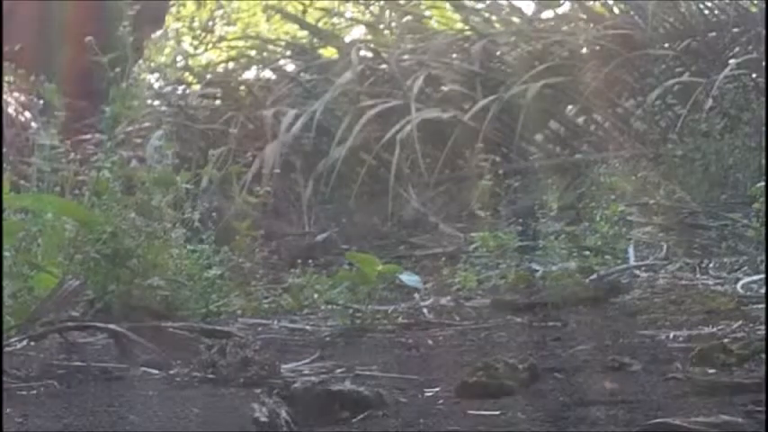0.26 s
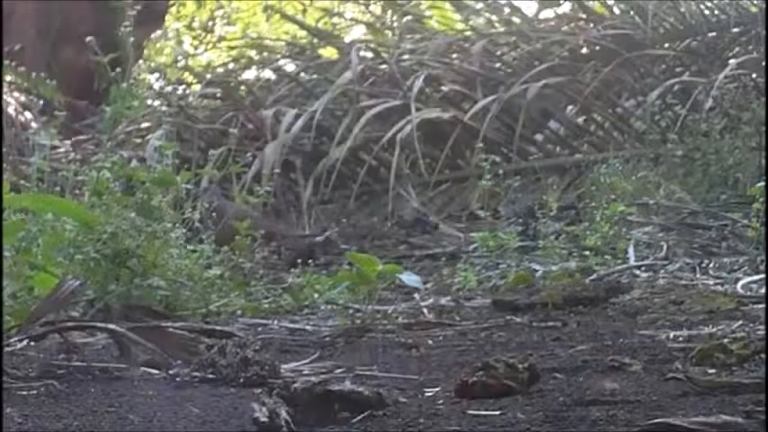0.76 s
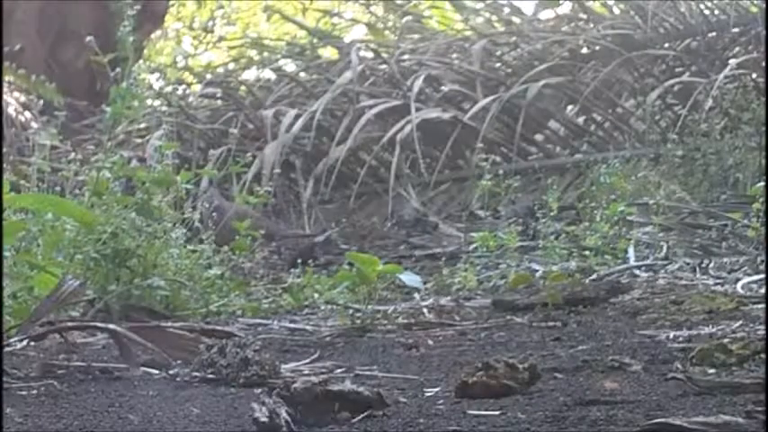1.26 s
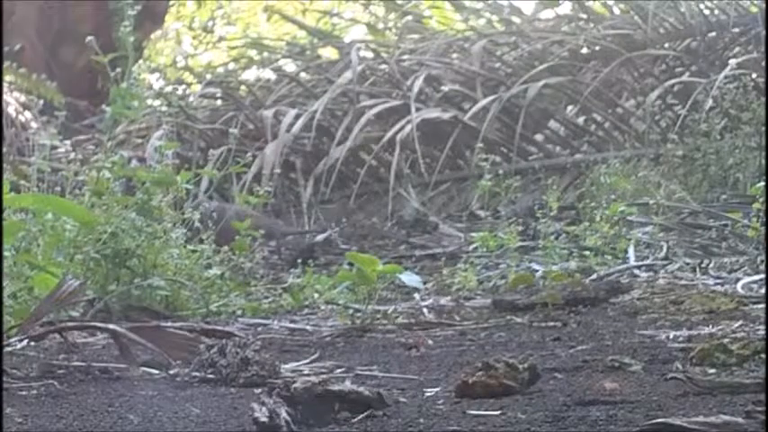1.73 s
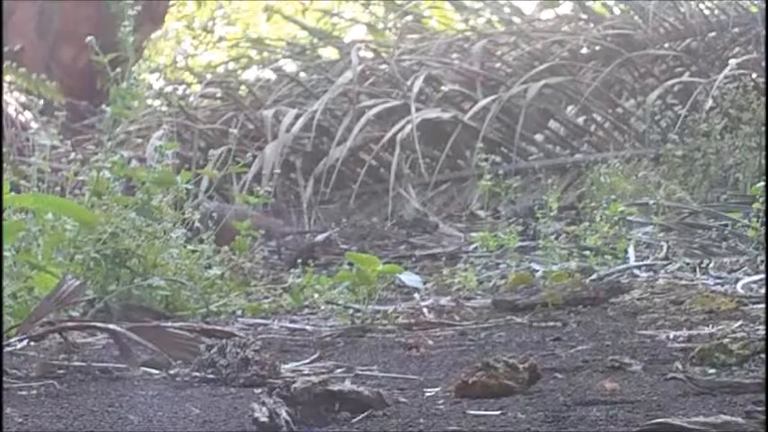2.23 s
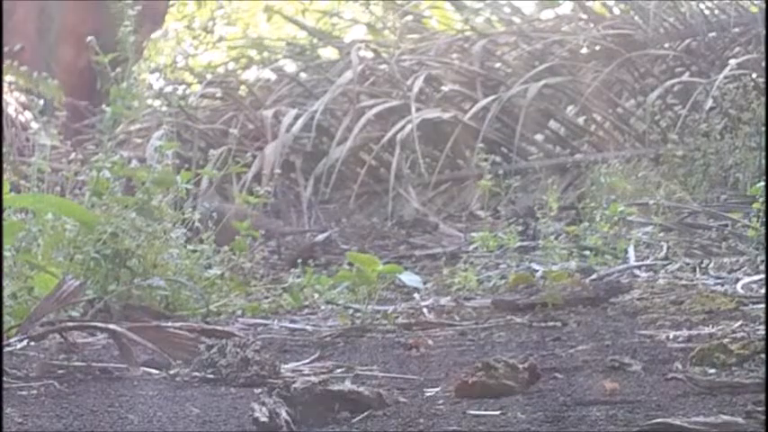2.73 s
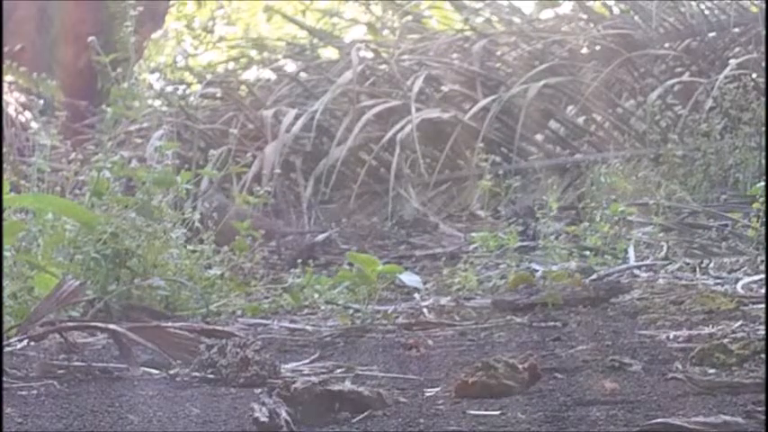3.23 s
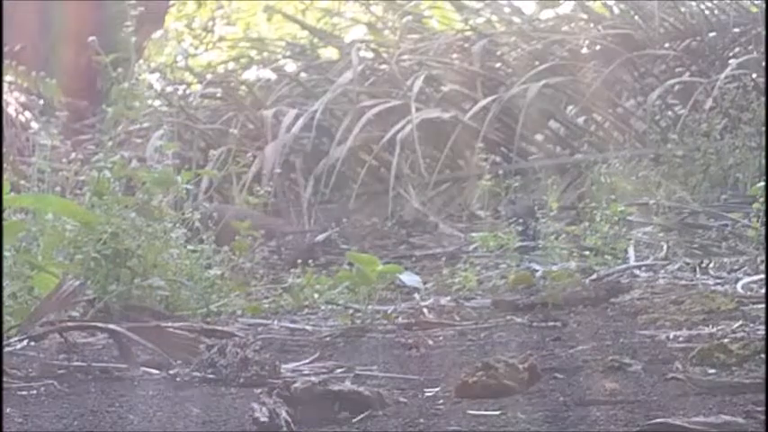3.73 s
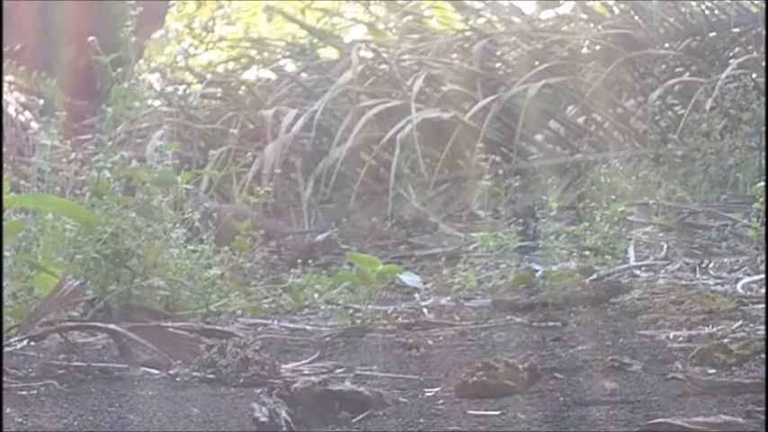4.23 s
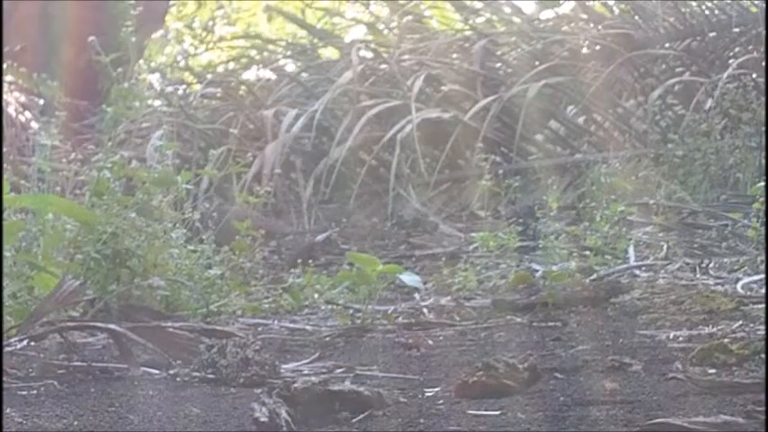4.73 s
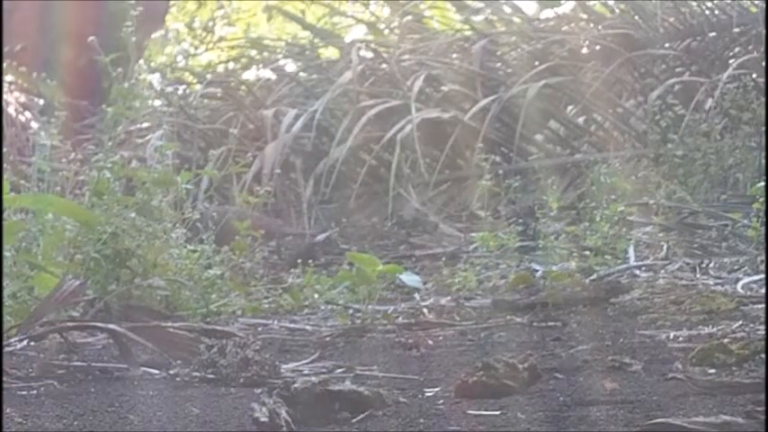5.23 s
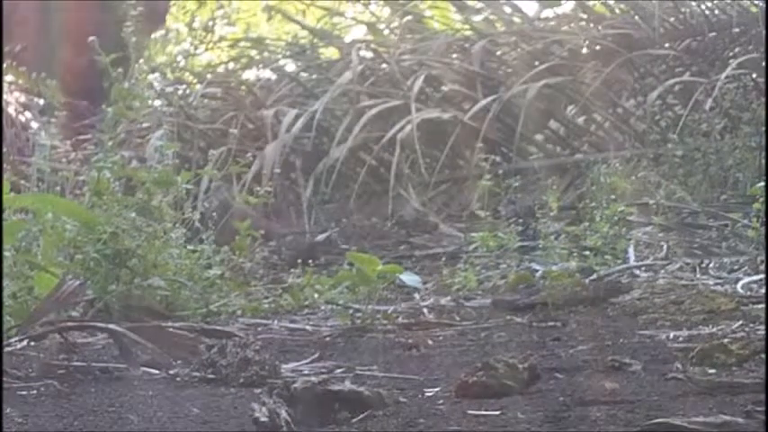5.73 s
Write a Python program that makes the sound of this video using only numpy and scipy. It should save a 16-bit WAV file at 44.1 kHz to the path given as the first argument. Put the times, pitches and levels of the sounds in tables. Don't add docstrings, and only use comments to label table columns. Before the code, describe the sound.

Outdoors in quiet undergrowth, a small mono camera hisses steadily over thin insect hum and faint low traffic. A far dove hoots and purrs, a songbird repeats a quick slowing phrase, and a nearer dove answers with swelling, rolling coos in three bouts. The far dove overlaps its later purrs. Near the end another small bird gives regular bright chirps. Light woodland echo surrounds the birds.

```python
import sys
import numpy as np
from scipy import signal
from scipy.fft import rfft, irfft, dct
from scipy.io import wavfile
from scipy.ndimage import uniform_filter1d

SR = 44100
rng = np.random.default_rng(int(sys.argv[2]) if len(sys.argv) > 2 else 0)


def linear_from_db(decibels):
    return 10 ** (np.asarray(decibels, float) / 20)


def inscribe(sig):
    pcm = np.round(np.clip(np.atleast_2d(sig).T, -1, 1) * 32767)
    wavfile.write(sys.argv[1], SR, pcm.astype(np.int16))


N = 263718

# (frequency [Hz], level [dB])
DRONE_LEVEL = [(0, -79.5), (1.299, -80), (1.6, -78), (3.2, -75), (3.599, -80), (5.98, -81)]
DRONE_COLOUR = [(100, -49), (160, -5.5), (185, -9), (210, 0.5), (240, -14.0), (330, -15), (450, -30.5)]

# (centre [Hz], width [Hz], level [dB])
INSECT_BANDS = [
    (7200, 610, -65.0),
    (6970, 830, -67.5),
]

# (frequency [Hz], level [dB per Hz])
HISS_COLOUR = [(25, -31), (60, -29), (105, -17.5), (165, -17), (210, -15), (260, -8), (700, -1.5),
               (1300, -3), (2200, -5), (4000, -10.5), (6000, -10.5), (8600, -12), (12000, -9.5),
               (12800, -15), (14300, -8.5)]
HISS_DB = -57.5
PUFF_COLOUR = [(2500, -37), (5500, 29), (6500, 47.5), (8500, 32), (11500, 43.5), (13000, 19), (15000, -69)]
PUFF_TICKS = [0, 4, 9, 13, 15, 20, 24, 29, 34, 35, 40, 45, 50, 54, 56, 60, 70, 75, 76, 81, 85, 90, 95, 96,
              100, 105, 110, 114, 116]
CLOCK_S, FIRST_TICK_S, PUFF_DB = .05, .004, -60.5

# (time [s], bar over the hiss
# [dB])
THIN_MOMENTS = [(.18, 4), (.243, 4), (.412, 5), (.71, 6.5), (1.183, 4), (2.354, 7), (2.48, 6), (2.527, 4),
                (2.568, 5), (3.25, 4), (3.656, 5), (4.038, 4), (4.274, 3), (4.423, 4), (4.617, 3),
                (4.698, 4), (4.829, 7), (5.278, 5), (5.47, 7), (5.659, 6.5),
                (.308, 7),
    (.325, 7),
    (4.535, 8),
    (4.552, 7),
]
# (frequency [Hz], added level [dB])
BAR_SHAPE = [(300, 4), (1200, -3), (2500, -1), (4500, 2), (6200, 2), (7200, -2), (8500, 2), (15000, 1)]

# (time [s], fundamental [Hz], level [dB])
WHISTLE = [(.45, 690, -75), (.5, 702, -69), (.62, 687, -68), (.75, 685, -69), (.88, 660, -66),
           (1.0, 632, -67.5), (1.09, 624, -77.5)]
# (multiple [number], level at the start [dB], level at the end [dB])
WHISTLE_OVERTONES = [
    (4, 6, -10),
    (5, -1.5, -1.5),
    (6, -4, 2.5),
]

# (time after the start [s], pitch [Hz], level [dB])
NOTE_SHAPES = dict( rise=[(0, 1160, -7), (.012, 1640, 5), (.024, 2450, -6)], hook=[(0, 2573, -14),
               (.008, 2345, 4), (.02, 2240, 5.5), (.034, 2297, -22)], drop=[(0, 1703, -23), (.01, 1574, 4),
               (.024, 1340, -9.5)], slide=[(0, 2195, 3.5), (.016, 1939, 3), (.03, 1750, -4),
               (.045, 1600, -44)], whip=[(0, 3205, -9.5), (.01, 2880, 0.5), (.017, 2580, 0.5),
               (.023, 2030, -3)], pip=[(0, 1496, -17), (.012, 1400, 8.5), (.026, 1310, -16)],
               chirp=[(0, 2660, -3.5), (.015, 3086, -1), (.022, 3500, -2.5), (.027, 4265, -9),
               (.031, 6060, -10), (.032, 3000, -11), (.043, 3740, -7.5), (.05, 4100, -29)],
               lead=[(0, 2672, -1), (.015, 2858, 1), (.024, 3050, 3), (.036, 2750, -6)],
               lift=[(0, 1489, -4), (.018, 1510, -7), (.024, 1970, -3.5), (.04, 2050, -24)])
# (note [name], time after the start [s], part [name], level [dB], starting pitch [Hz])
PHRASE = [
    ("rise", 0, "head", -6.5, 1150),
    ("hook", .023, "head", 0, 2540),
    ("drop", .079, "tail", -4, 1630),
    ("slide", .146, "slide", 0, 2110),
    ("whip", .225, "tail", 0, 3220),
    ("pip", .24, "tail", -14, 1430),
]
# (start [s], stretch [ratio], head level [dB], slide level [dB], tail level [dB])
REPEATS = [
    (1.2, 0.98, -47, -45.5, -46.5),
    (1.523, 1.043, -50.5, -57, -46),
    (1.855, 1.105, -47.5, -53, -52),
    (2.207, 1.12, -49.5, -93, -95),
]
# (time [s], level [dB], grace note level [dB])
CHIRPS = [
    (5.116, -63.5, -90),
    (5.241, -62.5, -90),
    (5.367, -55.5, -90),
    (5.491, -52.5, -90),
    (5.645, -54, -63),
    (5.786, -55, -60),
    (5.93, -53.5, -65.5),
]
CHIRP_HZ, GRACE_HZ, GRACE_S = 2716, 2564, .022
# (note [name], time [s], level [dB], starting pitch [Hz])
STRAYS = [("lift", 0.00414, -53.5, 1512), ("pip", 0.0069, -70, 3230), ("whip", .558, -62, 3160),
          ("pip", 1.411, -54.5, 2004), ("pip", 1.672, -57, 2400), ("whip", 1.685, -64, 3750),
          ("pip", 2.035, -52.5, 1934), ("pip", 2.106, -55.5, 2353), ("pip", 2.305, -61, 2330),
          ("pip", 3.336, -63, 1544), ("slide", 3.351, -68, 2100), ("pip", 3.47, -66, 1580),
          ("pip", 3.576, -63, 2084), ("pip", 3.701, -68, 1930), ("whip", 3.9, -64.5, 3210),
          ("pip", 5.44, -69, 2100), ("pip", 5.71, -69, 2350), ("lead", 5.96, -58, 2660)]
SCATTER_DB_PER_OCTAVE = 2.5

# (start [s], wait for second swell [s], clean hold [s], effort [dB], dip [dB])
OPENERS = [
    (1.66, .265, .117, -39.5, -24.5),
    (3.358, 0.22, .014, -39.5, -10),
    (4.774, .18, 0.0194, -39.5, -6),
]
# (start [s], length [s], effort [dB], top [Hz], last [Hz])
NEAR_PURRS = [
    (2.212, .512, -42.3, 708.6, 571),
    (3.76, .33, -43, 710.6, 647),
    (5.147, .545, -42, 700, 575),
]
FAR_PURRS = [
    (.725, 0.46, -52.5, 743.6, 537),
    (3.92, .535, -51.5, 758, 598),
    (5.44, .5, -53.5, 757.6, 529),
]
# (start [s], climb [s], hold [s], effort [dB], top [Hz])
HOOTS = [
    (.19, 0.041, 0.025, -63.5, 512),
    (0.444, 0.06, 0.0444, -45.5, 726),
    (3.599, .082, .012, -46, 710),
]
# sag curve [power], pitch where it weakens [Hz], fading below it [dB per Hz],
# trill (first, last) [pulses per s], loss of trill depth [share], catch of breath [dB]
NEAR_STYLE = dict(power=1.9, weak_hz=637, db_per_hz=0.09, trill=(54, 68), loss=0.457, catch_db=-0.5)
FAR_STYLE = dict(power=1.9, weak_hz=670, db_per_hz=.05, trill=(40, 74), loss=0.647, catch_db=-6)
# (time [s], width [s], trill depth lost
# [share], swell [dB])
FILLS = [(2.5, 0.0094, .6, .4), (2.61, .022, .5, 1.2), (2.69, .02, .4, 2.2), (3.815, 0.032, .4, 1.5),
         (4.0, .02, .35, -.4), (4.06, .013, .35, 2.5), (5.375, 0.034, 0.51, .4), (5.53, .04, .3, 2.2),
         (5.66, .045, .1, -6.5)]

ATTACK_S, SHUT_HZ, ONSET_DB, END_DB = 0.02483, 465.5, -15, -26
TOP_HZ, DIP_PITCH, DIP_SCALE_DB = 699, 0.38, 10
SWELL_HZ_PER_S, SWELL_DB = 650, -2
HUMP_SHARE, SNAP_S = 0.117, .012
QUICK_TRILL = 74
PURR_RISE_S, PURR_FALL_S, HOOT_FALL_S = 0.01305, 0.0324, 0.0365
CATCH_S, CATCH_WIDTH_S = 0.075, 0.016


def read(points, hz):
    f, value = np.transpose(points)
    return np.interp(np.log(hz + 1), np.log(f + 1), value)


def evened(x):
    return x / np.sqrt(np.mean(x ** 2) + 1e-20)


def add(mix, s, sound):
    part = mix[round(s * SR):][:len(sound)]
    part += sound[:len(part)]


def unroll(rows):
    s, *columns = np.transpose(rows)
    t = np.arange(s[0], s[-1], 1 / SR)
    return s[0], [np.interp(t, s, c) for c in columns]


def coloured(spectrum):
    gain = linear_from_db(read(spectrum, np.fft.rfftfreq(N, 1 / SR)))
    return evened(irfft(rfft(rng.standard_normal(N)) * gain, N))


def drift(hz):
    return evened(signal.lfilter([1], [1, -np.exp(-2 * np.pi * hz / SR)], rng.standard_normal(N)))


def woods(x, t60, wet_db, echoes, blur_db):
    t = np.arange(SR // 2) / SR
    taps = rng.choice([-1., 1.], len(t)) * (rng.random(len(t)) < .05)
    tail = taps * linear_from_db(-60 * t / t60) * np.clip(t / 0.024, 0, 1)
    blur = taps * linear_from_db(-60 * t / 0.069)
    arrival = linear_from_db(blur_db) * blur / np.linalg.norm(blur)
    arrival[0] = 1
    path = linear_from_db(wet_db) * tail / np.linalg.norm(tail) + arrival
    for s, echo_db in echoes:
        add(path, s, linear_from_db(echo_db) * arrival)
    return signal.fftconvolve(x, path)


def drone():
    s, level_db = np.transpose(DRONE_LEVEL)
    return linear_from_db(np.interp(np.arange(N) / SR, s, level_db)) * coloured(DRONE_COLOUR)


def insects():
    hz = np.fft.rfftfreq(N, 1 / SR)
    hum = np.zeros(N)
    for centre, width, level_db in INSECT_BANDS:
        resonance = 1 + (2 * (hz - centre) / width) ** 2
        hum += linear_from_db(level_db) * evened(irfft(rfft(rng.standard_normal(N)) / resonance, N))
    return hum * linear_from_db(0.11 * drift(6.2))


def camera():
    gate = np.zeros(N)
    puff = linear_from_db(PUFF_DB) * signal.windows.tukey(round(0.018 * SR), .3)
    for tick in PUFF_TICKS:
        add(gate, max(FIRST_TICK_S + CLOCK_S * tick - .008, 0), puff)
    hiss = linear_from_db(HISS_DB + 0.75 * drift(2.6)) * coloured(HISS_COLOUR)
    return hiss + gate * coloured(PUFF_COLOUR)


def whistler():
    start, (hz, level_db) = unroll(WHISTLE)
    count = len(hz)
    angle = 2 * np.pi * np.cumsum(hz * (1 + 0.0024 * drift(21)[:count])) / SR
    mix = np.zeros(N)
    for k, first_db, last_db in WHISTLE_OVERTONES:
        waver_db = 4 * drift(30)[:count]
        loudness = linear_from_db(level_db + np.linspace(first_db, last_db, count) + waver_db)
        add(mix, start, loudness * np.sin(k * angle))
    return mix


def small_bird_notes():
    song, chirps = [], []
    for start, stretch, head_db, slide_db, tail_db in REPEATS:
        part_db = dict(head=head_db, slide=slide_db, tail=tail_db)
        for note, s, part, db, hz in PHRASE:
            song.append((note, start + stretch * s, db + part_db[part], hz))
    for s, db, grace_db in CHIRPS:
        chirps.append(("chirp", s, db, CHIRP_HZ))
        chirps.append(("lead", s - GRACE_S, grace_db, GRACE_HZ))
    return song + chirps + STRAYS


def songbirds():
    mix = np.zeros(N)
    for note, s, level_db, start_hz in small_bird_notes():
        _, (hz, shape_db) = unroll(NOTE_SHAPES[note])
        pitch = hz * start_hz / hz[0]
        husk = evened(uniform_filter1d(rng.standard_normal((2, 3000)), size=110))[:, :len(hz)]
        tone = np.sqrt(2) * np.sin(2 * np.pi * np.cumsum(pitch * (1 + .022 * husk[0])) / SR)
        tone *= linear_from_db(level_db + shape_db + 2.5 * husk[1]) * signal.windows.tukey(len(hz), .15)
        wet_db = -3.0 + SCATTER_DB_PER_OCTAVE * np.log2(pitch.mean() / 2200)
        add(mix, s, woods(tone, 0.53, wet_db, [(.028, -15), (.075, -16.5)], -5.0))
    return signal.sosfilt(signal.butter(4, 800, "highpass", fs=SR, output="sos"), mix)


def hoot(start, climb, hold, effort_db, top_hz):
    end = climb + hold
    # (s, dB, pitch as a share of the top, trill depth)
    rows = [(0, -15, 0.4, 1.1), (0.604 * climb, -10.5, .88, .7), (climb, -1.5, .995, .03),
            (end, 0, 1.0, .1), (end + 0.49 * HOOT_FALL_S, -9, .89, .6), (end + HOOT_FALL_S, -30, .73, .5)]
    return [(start + s, effort_db + db, top_hz * pitch, QUICK_TRILL, depth) for s, db, pitch, depth in rows]


def opener(start, swell, hold, effort_db, dip_db):
    low = 1 - DIP_PITCH * (1 - np.exp(-(dip_db / DIP_SCALE_DB) ** 2))
    swell_hz = TOP_HZ * .92 + SWELL_HZ_PER_S * hold
    end = swell + hold
    held = 0.7 * np.exp(-hold / 0.027)
    hump = ATTACK_S + HUMP_SHARE * swell
    clear_db = -.4 - 5.9 * held
    rows = [  # (s, dB, Hz, trill depth)
        (0, ONSET_DB, SHUT_HZ, .2),
        (ATTACK_S, 0, TOP_HZ, 0),
        (hump, -1.5, TOP_HZ, .04),
        (hump + SNAP_S, -3.5, .97 * TOP_HZ, .95),
        (.41 * swell, 0.46 * dip_db - 4.5, TOP_HZ * (low + 0.101), .98),
        (.55 * swell, dip_db, TOP_HZ * low, .9),
        (.8 * swell, -5, .91 * TOP_HZ, .85),
        (swell, SWELL_DB, swell_hz, .75),
        (swell + 0.19 * hold, clear_db, swell_hz, held),
        (end - 0.23 * hold, clear_db, .97 * swell_hz, held),
        (end, clear_db + 1.2, 0.876 * swell_hz, held),
        (end + SNAP_S, END_DB, SHUT_HZ, held)]
    return [(start + s, effort_db + db, hz, QUICK_TRILL, depth) for s, db, hz, depth in rows]


def purr(start, length, effort_db, top_hz, last_hz, power, weak_hz, db_per_hz, trill, loss, catch_db,
         fills=()):
    s = np.linspace(0, length, num=120)
    share = s / length
    rise = np.exp(-s / PURR_RISE_S)
    shut = np.clip((s - length) / PURR_FALL_S + 1, 0, 1)
    sag_hz = top_hz - (top_hz - last_hz) * share ** power
    catch = np.exp(-((length - CATCH_S - s) / CATCH_WIDTH_S) ** 2)
    db = effort_db + ONSET_DB * rise + END_DB * shut ** 2.3 + catch_db * catch
    db -= db_per_hz * np.maximum(weak_hz - sag_hz, 0)
    hz = sag_hz + (SHUT_HZ - sag_hz) * np.maximum(rise, shut)
    filled, swell_db = np.zeros((2, len(s)))
    for at, width, depth_lost, fill_db in fills:
        bump = np.exp(-((start + s - at) / width) ** 2)
        filled += depth_lost * bump
        swell_db += fill_db * bump
    depth = 1.05 - loss * share ** power - filled
    return np.transpose([start + s, db + swell_db, hz, np.interp(share, [0, 1], trill), depth])


def coo(rows, sweep, jitter, uneven_db):
    start, (effort_db, hz, rate, depth) = unroll(rows)
    depth = np.clip(depth, 0, 1)
    turns = np.cumsum(rate * (1 + jitter * drift(27.3)[:len(hz)])) / SR
    pulse = turns.astype(int)
    u = turns % 1
    size, lift, shoulder, slip = rng.standard_normal((99, 4))[pulse].T
    opening = np.interp(u, [0, .15, .38, .6, .92, 1], [0, .25, 1, .5, 0, 0])
    holding = np.interp(u, [0, .5, .78, .92, 1], [0, 0, .3, 0, 0]) * np.clip(1 + .6 * shoulder, 0, 2)
    chopped = 1 - depth + depth * (opening + holding)
    flow = uniform_filter1d(chopped * linear_from_db(uneven_db * depth * size), size=50)
    flow /= np.sqrt(1 - 0.71 * depth)
    arch = np.interp(u, [0, .2, .4, .6, .8, 1], [-.4, -.4, 0, .32, .15, -.2]) + .06 * lift
    glide = uniform_filter1d(1 + sweep * depth * arch, size=60)
    restart = np.diff(pulse, prepend=0) * np.clip(2 * depth - .7, 0, 1) * (1 + .25 * slip)
    angle = 2 * np.pi * np.cumsum(hz * glide) / SR
    angle += np.pi * np.cumsum(uniform_filter1d(restart, size=70))
    voice = np.sqrt(2) * (np.sin(angle) + linear_from_db(-33) * np.sin(2 * angle))
    return start, linear_from_db(effort_db) * flow * voice * signal.windows.tukey(len(u), .025)


def doves():
    near, far = np.zeros((2, N))
    near_coos = [opener(*row) for row in OPENERS]
    near_coos += [purr(*row, **NEAR_STYLE, fills=FILLS) for row in NEAR_PURRS]
    far_coos = [hoot(*row) for row in HOOTS] + [purr(*row, **FAR_STYLE) for row in FAR_PURRS]
    for rows in near_coos:
        add(near, *coo(rows, sweep=.27, jitter=.09, uneven_db=1.2))
    for rows in far_coos:
        add(far, *coo(rows, sweep=.2, jitter=.09, uneven_db=1.8))
    both = woods(near, .45, -21, [(.08, -26)], -17) + woods(far, .45, -19, [(.03, -24)], -19)
    crop = signal.butter(4, [455, 900], "bandpass", fs=SR, output="sos")
    return signal.sosfilt(crop, both[:N])


def scene():
    mix = drone() + insects() + camera() + whistler() + songbirds() + doves()
    return np.tile(mix, (2, 1))


def thinned(x):
    size = 1500
    size_steps = np.arange(size)
    window = np.sin(np.pi * (size_steps + .5) / size)
    hz = np.linspace(0, SR / 2, size)
    bar = linear_from_db(HISS_DB + read(BAR_SHAPE, hz)) * evened(linear_from_db(read(HISS_COLOUR, hz))) * .71
    out = x.copy()
    for s, over_db in THIN_MOMENTS:
        at = round(s * SR) - size // 2
        limit = bar * linear_from_db(over_db)
        lines = dct(x[at:at + size] * window, 4, norm="ortho")
        weak = lines / (1 + (abs(lines) / limit) ** 16)
        grown = .3 * (lines - weak) * (abs(lines) < 2 * limit)
        add(out, at / SR, window * dct(grown - weak, 4, norm="ortho"))
    return out


def roll_off(x):
    return signal.sosfilt(signal.butter(12, 16550, fs=SR, output="sos"), x)


def record(dry):
    treble_cut = signal.firwin(511, 15330, window=("kaiser", 9), fs=SR)
    mono = signal.oaconvolve(thinned(dry[0]), treble_cut, "same")
    return roll_off(np.tile(mono, (2, 1)))


dry = scene()
out = record(dry)
inscribe(out)
```